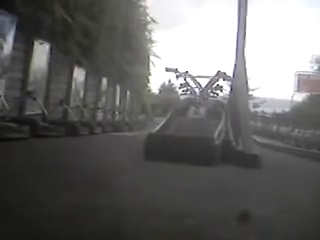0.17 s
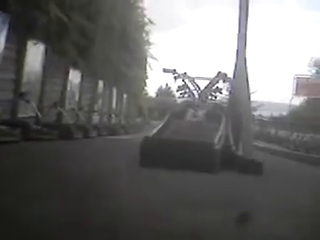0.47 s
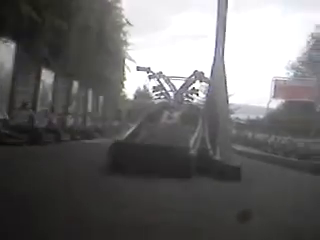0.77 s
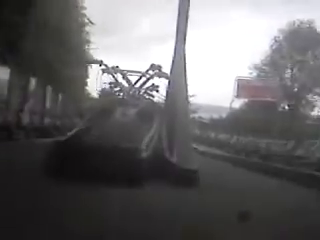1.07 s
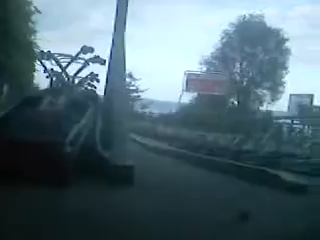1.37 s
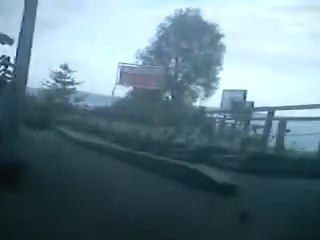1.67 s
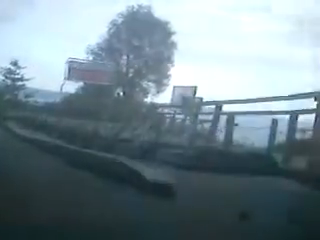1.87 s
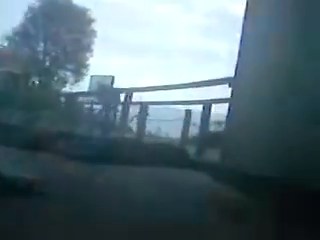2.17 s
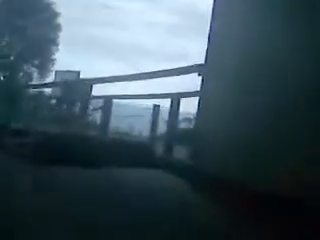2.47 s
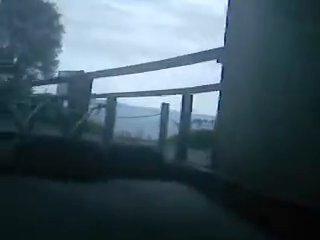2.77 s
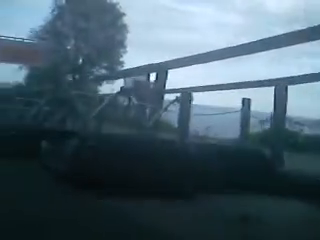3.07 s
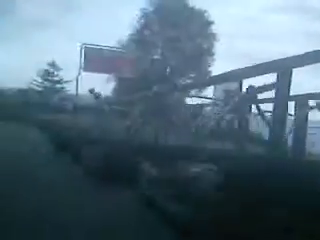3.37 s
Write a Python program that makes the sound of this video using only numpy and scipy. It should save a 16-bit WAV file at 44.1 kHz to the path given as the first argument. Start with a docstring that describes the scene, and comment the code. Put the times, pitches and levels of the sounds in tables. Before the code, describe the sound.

A small cart rumbles and rattles over paving, with knocks and hard, distorted jolts.

```python
"""Luge cart on paving

A cart rolls over paving, heard from a small camera fixed low on its body. It judders and
groans as it gets going. Then the wheels grind and knock, the shell drones and loose parts tick.
On the rougher stretch hard jolts drive the microphone to its limit."""
import sys
import numpy as np
from scipy import signal
from scipy.fft import rfft, irfft
from scipy.io import wavfile
from scipy.ndimage import uniform_filter1d

SR = 44100
rng = np.random.default_rng(int(sys.argv[2]) if len(sys.argv) > 2 else 0)


def to_wav(sig):
    """Store sig (one row per channel, or 1-D mono) as 16-bit WAV at the path in sys.argv[1].

    Samples outside -1..1 are clipped; the rate is SR.
    """
    pcm = np.clip(np.atleast_2d(sig), -1, 1) * 32767
    pcm = np.round(pcm).astype(np.int16)
    wavfile.write(sys.argv[1], SR, pcm.T)  # frames by channels


N = 154791

# How loud the rolling is over time: t/s, relative roar level/dB, relative grit level/dB
ROLL_LEVELS = [(0, -35.5, -41), (.15, -41, -47.5), (.25, -42.5, -48.5), (.32, -46.5, -44.5),
               (.43, -33, -37), (.55, -25, -35.5), (1.19, -24, -36), (1.25, -36, -41.5), (1.45, -24, -35.5),
               (1.62, -29.5, -34.5), (2.05, -29, -35), (2.22, -23.5, -30.5), (2.29, -31, -35.5),
               (2.41, -21, -24), (2.48, -27, -37.5), (2.76, -23.5, -26.5), (2.95, -28, -29),
               (3.05, -24, -26.5), (3.4, -21.5, -24), (3.5, -20.5, -31)]
# The tone of a tick or click on the cart: f/Hz, level/dB
TICK_SPECTRUM = [(60, -40), (300, -0.5), (700, -3), (1250, 9.5), (1750, 1.5), (2050, 6.5), (2700, 0),
                 (3250, -5.5), (3750, -10.5), (4500, -24.5)]


def amp(db):
    """Turns decibels into a gain to multiply by."""
    return 10 ** (np.asarray(db) / 20)


def unit(x):
    """Scales a signal to an average power of 1."""
    return x / np.sqrt(np.mean(x ** 2) + 1e-20)


def level(table, column):
    """Gain over time from one dB column of a table."""
    rows = np.array(table)
    return amp(np.interp(np.arange(N) / SR, rows[:, 0], rows[:, column]))


def add(mix, s, sound):
    """Adds a sound to the mix, starting at s seconds."""
    part = mix[max(0, round(s * SR)):][:len(sound)]
    part += sound[:len(part)]


def colour(x, spectrum, size=8192):
    """Gives x the tone of a spectrum, with a filter that rings only after each hit."""
    hz, db = np.transpose(spectrum)
    bin_hz = abs(np.fft.fftfreq(size, 1 / SR)) + 1
    log_gain = np.log(amp(np.interp(np.log(bin_hz), np.log(hz), db)))
    response = np.exp(np.conj(signal.hilbert(log_gain)))  # minimum phase
    ring = np.fft.ifft(response).real[:size // 2]
    return signal.fftconvolve(x, ring / np.linalg.norm(ring))[:N]


def flutter(hz, depth_db):
    """A random gain that wanders at rates up to about hz."""
    f = np.fft.rfftfreq(N, 1 / SR)
    slow_noise = irfft(rfft(rng.standard_normal(N)) / (1 + (f / hz) ** 2) ** 2, N)
    return amp(depth_db * unit(slow_noise))


def grains(per_s, spread_db):
    """Tiny contacts of uneven size at random times."""
    contacts = (rng.random(N) < per_s / SR) * rng.choice([-1., 1.], N)
    return contacts * amp(spread_db * np.clip(rng.standard_normal(N), -2, 2))


def steadied(x, span_s):
    """Evens out swells longer than span_s and keeps the fine grain."""
    size = max(8, int(span_s * SR))
    power = uniform_filter1d(uniform_filter1d(x ** 2, size), size)
    return x / np.sqrt(abs(power) + 1e-12)


def shell():
    """The shaken body drones at the pitch it rings at most easily, over a low rumble."""
    # How hard the body shakes: t/s, relative drone level/dB, relative rumble level/dB
    shaking = [(0, -43, -42), (.15, -51, -43), (.3, -38.5, -39), (.55, -39.5, -43.5), (.95, -34.5, -35.5),
               (1.6, -33.5, -36), (2.03, -29, -31.5), (2.5, -28.5, -33), (3.1, -21.5, -31.5),
               (3.5, -24.5, -29.5)]
    # The tones of the drone and the rumble: f/Hz, level/dB
    drone_spectrum = [(40, -42.5), (95, -26), (125, -10.5), (163, 0), (190, -10.5), (225, -16.5),
                      (320, -17.5), (700, -62.5)]
    rumble_spectrum = [(10, 0.5), (40, 0), (58, 14.5), (92, -11.5), (120, -11.5), (300, -48)]
    drone = steadied(colour(rng.standard_normal(N), drone_spectrum), span_s=0.51)
    rumble = steadied(colour(rng.standard_normal(N), rumble_spectrum), span_s=.15)
    return amp(2) * drone * level(shaking, column=1) + amp(-1) * rumble * level(shaking, column=2)


def wheel_hum():
    """The wheels' hum swells in the shell, nearly a pure tone with a wavering pitch."""
    # The peak of each swell: t/s, level/dB
    swells = [(.91, -24.5), (1.04, -21.5), (1.13, -26.5), (1.33, -25), (1.54, -20), (1.64, -26.5),
              (1.83, -26), (1.98, -20), (2.17, -22.5), (2.26, -22.5), (2.75, -22.5), (3.28, -22),
              (3.39, -17)]
    hum_hz, swell_s = 166, .03
    t = np.arange(N) / SR
    loudness = sum(amp(db) * np.exp(-((t - s) / swell_s) ** 2) for s, db in swells)
    cycles = np.cumsum(hum_hz * flutter(hz=25, depth_db=.22)) / SR
    return loudness * np.sin(2 * np.pi * cycles)


def groans():
    """Rubber drags on the paving with a short, unsteady, falling tone."""
    # Faint groans as a wheel starts to turn: t/s, length/s, starting f/Hz, level/dB
    drags = [(0.212, 0.076, 415, -35.5), (0.345, 0.061, 342, -29)]
    fall_hz_per_s = 1300
    out, waver = np.zeros(N), flutter(hz=99, depth_db=1.0)
    for s, length, hz, db in drags:
        t = np.arange(0, length, 1 / SR)
        pitch = (hz - fall_hz_per_s * t) * waver[round(s * SR):][:len(t)]
        cycles = np.cumsum(pitch) / SR
        add(out, s, amp(db) * np.sin(np.pi * t / length) * np.sin(2 * np.pi * cycles))
    return out


def judder():
    """Something sticks and slips in fast, uneven pulses and makes the frame ring."""
    # Bursts as the cart gets going: t/s, length/s, relative level/dB, ring compared with scrape/dB
    bursts = [(0.017, 0.045, -36, 0.5), (0.075, 0.021, -38.5, -10), (0.102, 0.021, -38.5, -27),
              (0.171, 0.11, -49, -24), (0.352, 0.032, -39.5, -5)]
    # The tone of the scrape: f/Hz, level/dB
    scrape_spectrum = [(60, -54), (250, -5.5), (490, 9.5), (700, -10), (1100, 6), (1850, -4), (2200, -5),
                       (3000, -8), (4500, -23.5)]
    # The notes the frame rings with: f/Hz, relative level/dB, time to fade by 60 dB/s
    frame_notes = [(448, -8.5, 0.22), (1100, -8.5, 0.12), (2364, -16, 0.18)]
    slips_per_s = 153.8
    cycles = np.cumsum(slips_per_s * flutter(hz=113, depth_db=2.0)) / SR
    pulses = np.exp(-(cycles % 1) / 0.68) + 0.2
    slips = unit(pulses * rng.standard_normal(N))
    scrape_gain, ring_gain = np.zeros((2, N))
    for s, length, db, ring_db in bursts:
        burst = np.full(int(length * SR), amp(db + 8))
        add(scrape_gain, s, burst)
        add(ring_gain, s, amp(ring_db) * burst)
    t = np.arange(SR // 5) / SR
    ring = sum(amp(db - 60 * t / t60) * np.sin(2 * np.pi * hz * t) for hz, db, t60 in frame_notes)
    frame = signal.fftconvolve(slips * ring_gain, ring / np.linalg.norm(ring))[:N]
    return colour(slips * scrape_gain, scrape_spectrum) + frame


def chatter():
    """Loose parts make many faint ticks, growing with the grit under the wheels."""
    patter = colour(grains(per_s=110, spread_db=2.5), TICK_SPECTRUM)
    return amp(-8) * steadied(patter, span_s=0.63) * level(ROLL_LEVELS, column=2)


def ticks():
    """A loose part scrapes in, snaps against the frame and rattles briefly."""
    # Sharp ticks of loose parts: t/s, relative level/dB
    hits = [(1.0412, -19.5), (1.2874, -24.5), (1.433, -24.5), (1.5423, -26), (1.7109, -23), (1.7374, -17.5),
            (1.8114, -17.5), (1.896, -22), (1.9246, -18.5), (1.9705, -20), (1.9918, -22), (2.013, -20),
            (2.0329, -23), (2.072, -22), (2.1135, -17), (2.1371, -17.5), (2.233, -22), (2.3415, -17),
            (2.356, -10.5), (2.3782, -14), (2.4051, -17), (2.486, -29.5), (2.5136, -12), (2.5556, -18),
            (2.6615, -19.5), (2.7494, -18.5), (2.8487, -17), (2.8923, -17.5), (3.0491, -9), (3.0797, -13.5),
            (3.1793, -13.5), (3.1941, -19.5), (3.216, -16), (3.3593, -10.5), (3.4207, -19), (3.439, -15)]
    rise_s, decay_s, tail_s, lead_s = .0005, .0022, .008, .0006
    t = np.arange(-SR // 200, SR // 30) / SR  # the snap is at t = 0
    fade = np.exp(-abs(t) / decay_s) + .07 * np.exp(-abs(t) / tail_s)
    shape = np.where(t < 0, np.exp(-abs(t) / rise_s), fade)
    force = np.zeros(N)
    for s, db in hits:
        rattle = rng.standard_normal(len(t)) * shape
        snap = .85 * rattle / np.linalg.norm(rattle) - (t == 0)
        add(force, s + t[0] - lead_s, amp(db + 18) * snap)
    return colour(force, TICK_SPECTRUM)


def jolts():
    """A jolt pushes the microphone one way; the longer the push, the more the shell booms after it."""
    # Hard jolts: t/s, length before widening/s
    shocks = [(2.3705, 0.0024), (2.5638, 0.00066), (2.7492, 0.00076), (2.8719, 0.0027), (2.8792, 0.00069),
              (2.9875, 0.0012), (3.0163, 0.0012), (3.0489, 0.00083), (3.0715, 0.0024), (3.0793, 0.00078),
              (3.1085, 0.0017), (3.1781, 0.0012), (3.2138, 0.0013), (3.3237, 0.00096), (3.3624, 0.00071),
              (3.3715, 0.0042), (3.3921, 0.0016), (3.4122, 0.00074), (3.4186, 0.0016)]
    boom_hz, boom_decay_s, boom_gain_per_s = 150.9, 0.025, 75
    t, out = np.arange(SR // 10) / SR, np.zeros(N)
    boom = np.sin(2 * np.pi * boom_hz * t) * np.exp(-t / boom_decay_s)
    for s, length in shocks:
        width = 1.5 * length
        push = -0.873 * np.sin(np.pi * np.minimum(t / width, 1))
        add(out, s - (width - length) / 2, push)
        add(out, s + length, boom_gain_per_s * length * boom)
    return out


def knocks():
    """A wheel hits with a click and a crunch, rings a patch of the plastic body and bounces once."""
    # Wheel strikes on the paving: t/s, relative level/dB
    strikes = [(0.435, -14.5), (0.452, -11), (0.526, -13.5), (0.545, -16), (0.581, -14), (0.626, -18),
               (0.644, -20.5), (0.688, -11), (0.72, -13.5), (0.769, -17.5), (0.792, -18.5), (0.815, -14),
               (0.851, -15), (0.881, -16.5), (0.909, -14), (0.927, -31), (0.944, -12.5), (0.982, -16),
               (0.995, -19.5), (1.038, -10), (1.073, -16.5), (1.1, -12.5), (1.124, -17), (1.146, -19),
               (1.16, -14.5), (1.201, -12.5), (1.248, -17), (1.273, -19.5), (1.286, -13), (1.346, -15.5),
               (1.377, -14.5), (1.41, -11.5), (1.442, -19), (1.464, -14.5), (1.521, -13.5), (2.161, -13.5),
               (2.2, -21), (2.231, -14), (2.352, -12.5), (2.4, -15), (2.558, -13), (2.62, -16), (2.73, -16),
               (2.844, -13.5), (2.876, -13.5), (2.989, -14.5), (3.046, -13), (3.069, -9), (3.176, -17.5),
               (3.214, -16), (3.247, -11.5), (3.281, -12), (3.359, -10), (3.436, -10), (3.474, -20.5)]
    # The tone of the crunch: f/Hz, level/dB
    crunch_spectrum = [(40, -32), (150, -27), (300, 2), (400, 5), (560, -3), (720, 4), (1000, -2),
                       (1450, -2.5), (1850, -22), (2850, -22.5), (3800, -29.5), (4600, -50.5)]
    rise_s, decay_s, bounce_gap_s = 0.00034, 0.0058, .008
    low_hz, high_hz = 479, 1146
    t = np.arange(SR // 10) / SR
    shape = (1 - np.exp(-t / rise_s)) * np.exp(-t / decay_s)
    shape /= shape.max()
    force, rings, clicks = np.zeros((3, N))
    for (s, db), (spot, hop) in zip(strikes, rng.random((len(strikes), 2))):
        hz = low_hz * (high_hz / low_hz) ** spot  # each patch has its own pitch
        add(rings, s, amp(db - 6.5) * shape * np.sin(2 * np.pi * hz * t))
        add(clicks, s, amp(db - 13.5) * shape ** 4)
        add(force, s, amp(db - 5.5) * shape)
        add(force, s + bounce_gap_s * (.5 + hop), amp(db - 11) * shape)  # the softer bounce
    crack = steadied(colour(rng.standard_normal(N), TICK_SPECTRUM), span_s=0.0042)
    crunch = steadied(colour(grains(per_s=2500, spread_db=2), crunch_spectrum), span_s=.005)
    return rings + clicks * crack + force * crunch


def rolling():
    """The wheels grind over the grain of the paving: a lumpy roar with gritty treble on top."""
    # The tones of the roar and the grit: f/Hz, level/dB
    roar_spectrum = [(40, -26.5), (120, -17), (240, -0.5), (330, 4), (450, 8), (560, 1.5), (720, 4),
                     (1200, -5), (1850, -14), (3000, -40), (4500, -55.5)]
    grit_spectrum = [(200, -35.5), (900, -26.5), (1500, -3.5), (2050, -0.5), (2850, -1), (3200, -6.5),
                     (3750, -7.5), (4400, -26)]
    lumps = flutter(hz=120, depth_db=2.3)
    roar = steadied(colour(grains(per_s=2500, spread_db=-0.5) * lumps, roar_spectrum), span_s=0.13)
    grit = steadied(colour(grains(per_s=1000, spread_db=0.5) * lumps, grit_spectrum), span_s=0.12)
    roar *= amp(0.5) * level(ROLL_LEVELS, column=1)
    grit *= amp(-11) * level(ROLL_LEVELS, column=2)
    return roar + grit


def scene():
    """The rattle's loudest peaks are softly rounded, while the jolts stay sharp and crackle."""
    rattle_limit = .56
    body = rolling() + shell() + wheel_hum() + knocks() + ticks() + chatter() + judder() + groans()
    rounded = body / (1 + (body / rattle_limit) ** 4) ** .25
    return (rounded + jolts())[None]


def lowpass(x, hz):
    """Cuts away the sound above hz."""
    taps = signal.firwin(255, hz, window=("kaiser", 7), fs=SR)
    return signal.oaconvolve(x, taps[None], "same")


def record(dry):
    """The microphone overloads and loses its high treble; the tallest peaks clip again and crackle."""
    overloaded = np.clip(dry, -.665, .5)
    dulled = lowpass(overloaded, hz=4250)
    return lowpass(np.clip(dulled, -.638, .638), hz=15850)


dry = scene()
out = record(dry)
to_wav(out)
```